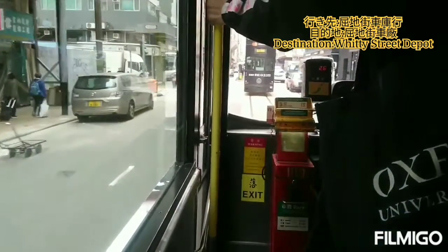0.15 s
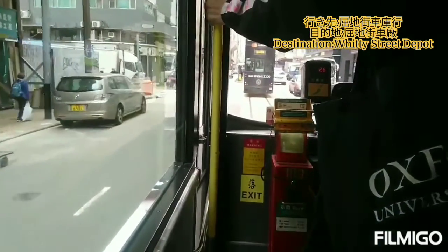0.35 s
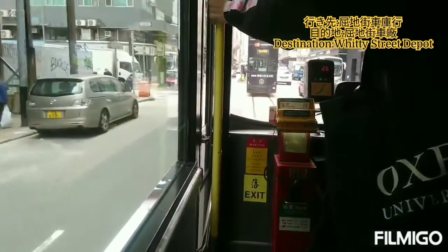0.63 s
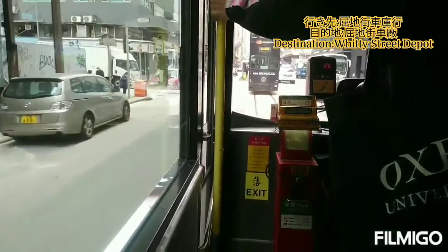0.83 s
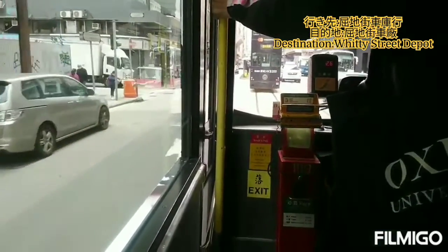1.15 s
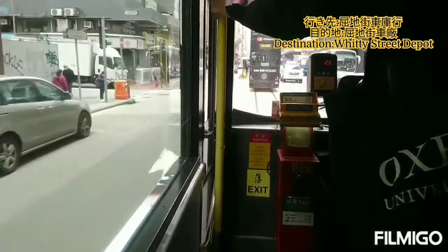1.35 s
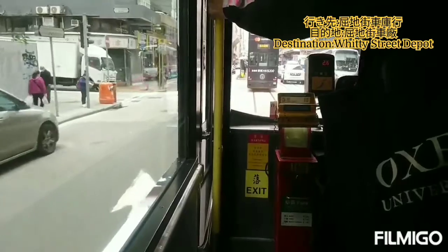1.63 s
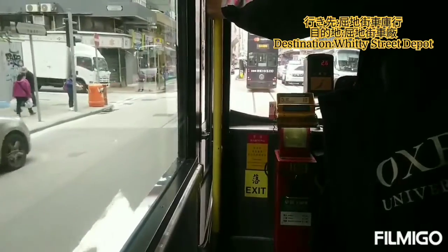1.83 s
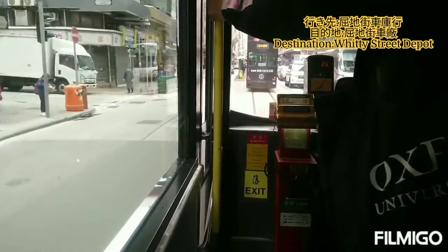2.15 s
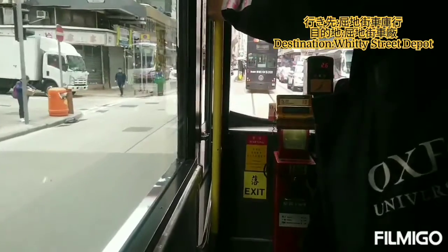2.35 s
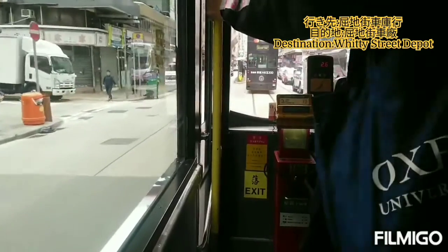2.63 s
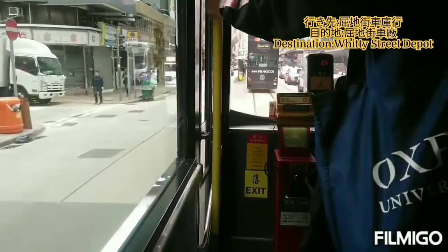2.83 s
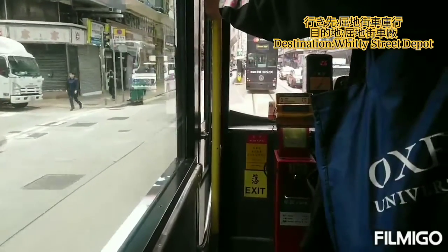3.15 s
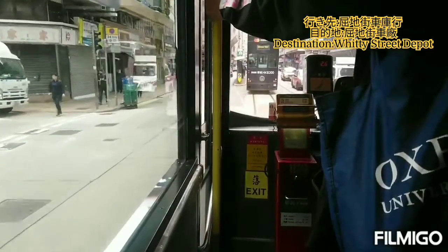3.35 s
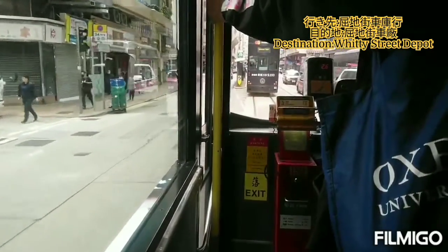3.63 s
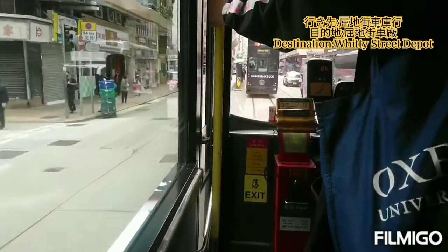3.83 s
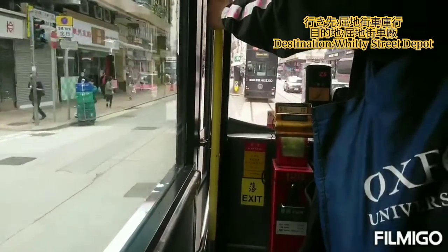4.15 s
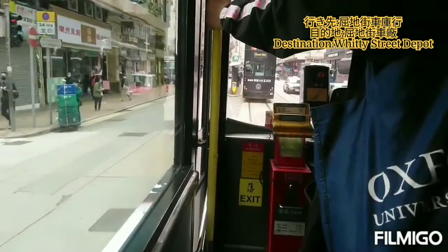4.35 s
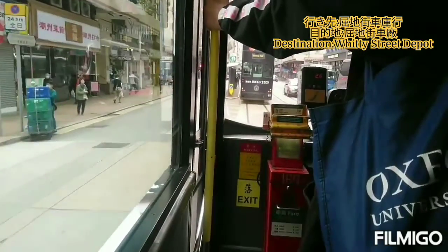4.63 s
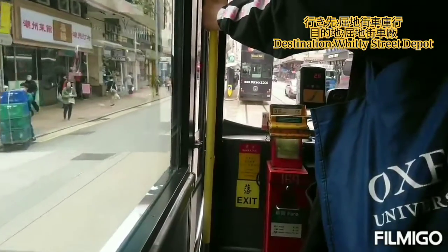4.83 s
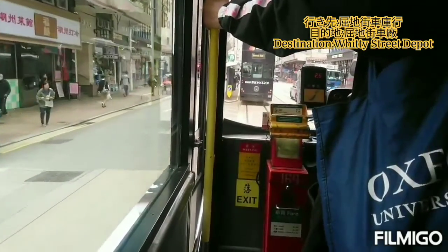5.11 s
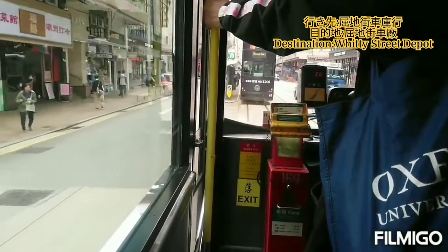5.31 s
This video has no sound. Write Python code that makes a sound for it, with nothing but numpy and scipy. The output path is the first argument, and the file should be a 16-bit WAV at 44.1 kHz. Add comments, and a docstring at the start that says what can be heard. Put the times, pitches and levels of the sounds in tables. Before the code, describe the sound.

Inside a slow tram, loud thuds and clattering fittings open abruptly, then a quiet low rumble continues with occasional knocks and faint late wheel singing.

```python
"""Low thuds, knocks and loud clatter come first, then the steady rumble of a slow tram from inside.
Rough rail shakes the wheels, and the floor and side panels rumble at their own pitches (filtered noise).
At joints and points the floor thuds and the frame knocks (fading sine waves), and loose fittings clatter
(bursts of coloured noise). Small parts tick, and a wheel sings faintly near the end (narrow noise).
Faint steady high hiss lies underneath."""
import sys
import numpy as np
from scipy import signal
from scipy.io import wavfile

SR = 44100
rng = np.random.default_rng(int(sys.argv[2]) if len(sys.argv) > 2 else 0)


def unload_wav(signal):
    """Save mono or channel-first audio to the path in sys.argv[1] as 16-bit WAV at rate SR, clipped to [-1, 1]."""
    wavfile.write(
        sys.argv[1],
        SR,
        np.round(np.clip(np.atleast_2d(signal).T, -1, 1) * 32767).astype(np.int16),
    )


N = 241336   # length in samples

# Steady rolling of the car body: start_s, floor_boom_db, panel_rumble_db
BODY_ROLLING = [(0, -29, -21), (.4, -46.5, -40.5), (.6, -46, -42), (.9, -48.5, -41.5), (1.2, -45, -43),
                (1.55, -50.5, -39.5), (1.75, -48.5, -45), (2.2, -46.5, -43), (2.6, -45, -41.5),
                (2.8, -45.5, -38.5), (2.98, -46.5, -44.5), (3.23, -49, -42), (3.7, -48.5, -45),
                (3.9, -47, -38.5), (4.2, -52, -44), (4.5, -44.5, -37), (4.87, -47, -37.5), (5.2, -44, -43),
                (5.47, -51.5, -43)]
# Wheels on the rail head: start_s, low_roar_db, high_roar_db, grinding_db, grinding_centre_hz
WHEELS_ON_RAIL = [(0.0, -47, -49, -61, 2470), (0.03, -39, -58, -47.5, 2620), (0.18, -42.5, -62, -55, 2630),
                  (0.33, -60.5, -75, -60, 2330), (0.47, -52, -62.5, -66, 2490), (0.68, -54, -64, -74, 2370),
                  (0.84, -48.5, -60, -71, 2680), (1.05, -54.5, -64.5, -74, 2437),
                  (1.25, -54.5, -70.5, -75, 2580), (1.42, -54, -61, -73, 2330),
                  (1.69, -54.5, -67.5, -74, 2700), (1.74, -55, -66, -70.5, 3110),
                  (1.9, -48.5, -62, -72, 2684), (2.03, -54, -70.5, -76, 3184),
                  (2.16, -54.5, -67.5, -66, 2525), (2.33, -55.5, -61, -71.5, 3140),
                  (2.36, -46, -54, -75, 2466), (2.48, -57.5, -67, -64, 2960),
                  (2.65, -52.5, -62, -71.5, 3110), (3.03, -54, -64.5, -69, 2530),
                  (3.23, -53, -66, -68.5, 3170), (3.35, -55.5, -65.5, -71.5, 2460),
                  (3.7, -52.5, -67.5, -71.5, 2650), (3.93, -54.5, -62.5, -70, 2310),
                  (4.26, -50.5, -63, -73, 2500), (4.51, -54.5, -62, -71, 2304),
                  (4.65, -52, -59.5, -70, 2444), (4.87, -53, -62.5, -69, 2606),
                  (5.1, -52.5, -64, -68.5, 2560), (5.47, -52, -64, -71, 2560)]
# Resonances of the floor, then of the side panels: pitch_hz, half_width_hz, level_db (relative)
# Each of the two filter passes is twice half_width_hz wide.
FLOOR_RESONANCES = [(51.4, 23, 4), (62, 4.6, -15.5), (88.4, 32, 0.5), (107, 60, -9.5)]
PANEL_RESONANCES = [(162, 16.8, 1.5), (192.9, 19.6, 3.5), (250.1, 5.9, -1), (287.3, 39, 2.5),
                    (357, 46, -9.5), (403, 18, -18), (500, 17, -17.5)]
# Tone colour of the low roar, the high roar and the grinding: pitch_hz, level_db (relative, per Hz)
LOW_ROAR_COLOUR = [(300, -2.5), (400, -1), (500, -2.5), (630, -7.5), (800, -9), (1000, -16.5), (1250, -31)]
HIGH_ROAR_COLOUR = [(800, -9), (1000, 0), (1250, 0.5), (1500, -4.5), (1750, -8.5), (2000, -15),
                    (2600, -28.5)]
GRINDING_COLOUR = [(1200, -31), (1700, -3), (2100, 0), (2500, -3), (3200, -3), (3800, -4.5), (4300, -10.5),
                   (4800, -23), (5500, -31), (7000, -53.5)]
GRINDING_PEAK_DB, GRINDING_PEAK_OCTAVES = 8, 0.34   # extra level around the wandering centre, and its spread

# Floor thuds: start_s, peak_db (before the treble cut), pitch_hz, length_s
FLOOR_THUDS = [(0, -9, 78, 0.031), (0.067, -16.5, 52, 0.083), (0.124, -6, 62, 0.016),
               (0.152, -7, 53.4, 0.04), (0.224, -9.5, 56.8, 0.066), (0.248, -11, 52.5, 0.076),
               (0.306, -25.5, 55, 0.048), (0.553, -33.5, 62, 0.049), (0.728, -18, 62, 0.033),
               (0.781, -34, 51, 0.067), (0.847, -36.5, 60, 0.06), (0.861, -39, 62, 0.086),
               (1.832, -34, 73.6, 0.023), (1.892, -20.5, 50.2, 0.038), (1.902, -16, 58.9, 0.05),
               (1.952, -42, 58.8, 0.028), (2.044, -31.5, 76, 0.026), (2.36, -26, 67.2, 0.085),
               (2.397, -18, 50, 0.076), (2.73, -39.5, 58.6, 0.058), (3.978, -30, 88, 0.018),
               (4.025, -26.5, 56, 0.042), (4.085, -30, 55.4, 0.02), (4.185, -27.5, 51.7, 0.081),
               (4.328, -38.5, 73, 0.059), (4.527, -24, 62.5, 0.02), (4.572, -22, 51.4, 0.025)]
THUD_CUT_HZ = 400   # treble cut on the thuds, so their starts and ends stay soft
# Frame knocks: start_s, peak_db, pitch_hz, fade_s (time to fall 60 dB)
FRAME_KNOCKS = [(0.023, -17, 191, 0.046), (0.067, -16.5, 267, 0.06), (.086, -16, 230, 0.029),
                (0.1, -15.5, 281, 0.07), (0.141, -17.5, 191, 0.035), (0.222, -17, 186, 0.28),
                (0.239, -16, 232, 0.078), (0.688, -31, 285, 0.14), (0.719, -20, 258, 0.037),
                (1.305, -31, 193, 0.074), (1.511, -33.5, 184, 0.23), (1.822, -30, 280, 0.068),
                (1.834, -24, 290, 0.034), (1.849, -24, 300, .06), (1.861, -14.5, 301, 0.051),
                (1.889, -33, 394, 0.084), (1.92, -27, 176, 0.16), (2.28, -32.5, 283.3, 0.22),
                (2.309, -24.5, 279, 0.14), (2.391, -30.5, 162.3, 0.32), (2.438, -33, 230, 0.042),
                (2.544, -33.5, 167, 0.083), (2.597, -37, 311, 0.066), (2.744, -32.5, 297.7, 0.22),
                (2.814, -37, 190, 0.075), (3.23, -34.5, 308.5, 0.094), (3.761, -37.5, 179, 0.19),
                (3.984, -27, 153, 0.095), (4.007, -21.5, 192, 0.08), (4.017, -28.5, 280, 0.023),
                (4.05, -44, 322, 0.038), (4.06, -27.5, 204, 0.049), (4.078, -30, 263, .05),
                (4.37, -30.5, 303, 0.091), (4.476, -21.5, 202, 0.064), (4.51, -27.5, 243, 0.062),
                (4.616, -34, 178, 0.11), (4.691, -27, 188, 0.1), (4.766, -33.5, 305, 0.23),
                (5.03, -34.5, 202.5, 0.23), (5.308, -31, 202, 0.14)]
# Boom around each thud and rumble around each knock: dB relative to the blow, seconds to rise or fall 20 dB
BOOM_UNDER_DB, BOOM_RISE_S, BOOM_FALL_S = -12.5, 0.11, 0.11
PANEL_UNDER_DB, PANEL_RISE_S, PANEL_FALL_S = -13.5, 0.041, 0.11

# Rattles of loose parts: peak_s, seats_and_doors_db, hand_rails_db, panes_and_treble_db, rise_s, fall_s (20 dB)
LOOSE_RATTLES = [(0.024, -41, -40.5, -51, 0.023, 0.07), (0.065, -27.5, -43, -47.5, 0.059, 0.18),
                 (.043, -38, -46, -52, .03, 0.054), (.103, -26.5, -36, -44, 0.07, 0.12),
                 (0.14, -31, -32, -45, 0.039, 0.056), (0.187, -28, -44, -45.5, 0.047, 0.02),
                 (0.258, -38.5, -52, -49, 0.099, 0.16), (0.304, -39, -39.5, -52.5, 0.18, 0.061),
                 (.37, -51, -51, -74, .06, 0.12), (.755, -53, -70, -77, 0.059, 0.14),
                 (.845, -62, -67.5, -65, 0.2, 0.18), (1.87, -51, -48.5, -59, 0.027, 0.092),
                 (1.897, -44, -60, -68, 0.042, 0.06), (1.925, -57, -65, -63.5, .03, 0.065),
                 (1.99, -64, -78, -61.5, 0.11, 0.13), (2.049, -68, -71, -67, 0.096, 0.044),
                 (2.33, -49, -58, -73, 0.05, 0.066), (2.344, -42, -55, -67, 0.043, 0.037),
                 (2.375, -56, -51, -65, 0.053, .06), (2.4, -57, -47.5, -57.5, 0.057, 0.15),
                 (2.445, -50, -50, -57, 0.063, 0.12), (2.505, -61, -58.5, -59, 0.04, 0.15),
                 (2.57, -54, -81, -66.5, .06, 0.17), (2.86, -63, -59, -68, 0.049, 0.093),
                 (3.48, -66, -80, -63.5, 0.047, 0.063), (4.028, -41.5, -48.5, -64.5, 0.03, 0.077),
                 (4.051, -47.5, -55, -67.5, 0.052, 0.17), (4.11, -65, -56, -77, 0.051, .05),
                 (4.23, -55.5, -58, -83, 0.063, .08), (4.319, -61, -64, -79, 0.09, 0.037),
                 (4.58, -60, -57.5, -72, 0.29, 0.13), (4.75, -51, -71, -74.5, 0.056, 0.2),
                 (5.392, -47.5, -63, -68.5, 0.038, 0.051)]
# Tone colour of seats and doors, then of hand rails: pitch_hz, level_db (relative, per Hz)
FITTINGS_COLOUR = [(300, -14), (420, 6.5), (520, 7.5), (700, -4), (900, -12), (1200, -27.5)]
RAILS_COLOUR = [(700, -7), (900, 2.5), (1200, -8), (1500, -3.5), (1900, -9.5), (2300, -20.5), (2800, -33.5)]
# Tone colour of the window panes up to 8000 Hz; above that, faint airy treble that swells with the rattles:
# pitch_hz, level_db (relative, per Hz)
PANES_AND_TREBLE_COLOUR = [(1500, -21), (1900, -5.5), (2300, -2.5), (2700, -4.5), (3200, -2.5), (3700, -7),
                           (4200, -16), (4800, -19.5), (5500, -23.5), (6400, -27), (7000, -39.5),
                           (8500, -34), (10500, -31), (13000, -41), (16000, -44.5)]
# Two rings of the panes, then a broad band of the same airy treble in the last row:
# pitch_hz, half_width_hz (as for the floor), level_db (relative)
RINGS_AND_TREBLE = [(3420, 120, -10.5), (6150, 160, -19), (8560, 990, -21.5)]

# Sharp taps and ticks: start_s, peak_db, pitch_hz, width_hz, fade_s (time for the noise to fall 60 dB)
SHARP_TICKS = [(0.022, -39, 1190, 1190, 0.033), (.063, -22, 606, 260, 0.034), (0.074, -41, 1480, 400, .04),
               (0.1, -27, 1200, 990, 0.043), (.186, -29.5, 600, 400, .04), (.03, -36, 2000, 1500, 0.035),
               (.22, -44, 2500, 2500, .04), (.29, -40, 2280, 2500, 0.055), (0.137, -35, 1520, 500, 0.036),
               (0.139, -14, 464, 200, 0.045), (.172, -24, 520, 247, .04), (0.255, -29, 900, 300, 0.044),
               (.066, -42, 2500, 1500, .04), (.1, -36, 3000, 1990, .04), (.143, -42, 3300, 2400, .04),
               (.28, -56.5, 5150, 400, .25), (.354, -42, 1100, 690, 0.045),
               (1.7615, -42, 3240, 1100, 0.012), (1.7615, -47.5, 2120, 1105, 0.013),
               (1.861, -32.5, 805, 295, 0.095), (1.865, -55, 3270, 400, 0.054),
               (1.866, -59, 5300, 500, 0.74), (1.89, -35.5, 826, 400, 0.041), (1.995, -45.5, 780, 99, .08),
               (2.126, -60, 900, 600, 0.033), (2.228, -45.5, 780, 91, 0.52), (2.349, -38, 720, 202, 0.066),
               (2.398, -34.5, 890, 500, 0.052), (2.327, -47, 1300, 600, .05), (2.346, -45, 1400, 600, .05),
               (2.398, -43, 1480, 500, 0.047), (2.398, -59, 3200, 1800, 0.034),
               (2.443, -59, 3200, 1400, .06), (2.499, -52, 3020, 700, 0.055), (2.565, -55, 3100, 600, .08),
               (2.495, -42.5, 920, 296, 0.089), (3.469, -64, 2400, 500, .1), (3.55, -58.5, 2430, 300, 0.14),
               (3.735, -60, 3700, 3020, 0.04), (3.845, -52, 1500, 800, 0.062), (4.02, -49, 1700, 1000, .06),
               (4.047, -42.5, 1410, 890, .05), (4.11, -50, 1200, 1200, 0.045),
               (4.0189, -32, 785, 387, 0.044), (4.036, -62, 5380, 900, 0.31),
               (4.052, -31.5, 560, 302, 0.07), (4.065, -35, 524, 256, 0.1), (4.325, -49, 1405, 400, 0.067),
               (4.635, -51.5, 1800, 600, 0.043), (4.643, -43, 765, 140, 0.04), (4.735, -37, 476, 91, 0.1),
               (4.811, -42, 724, 100, 0.037)]
CONTACT_OVER_NOISE = 1.2   # strength of the first contact in a tick

# Bursts of wheel song: peak_s, low_ring_db, high_ring_db, low_ring_hz
WHEEL_SONG = [(4.33, -58.5, -87, 760), (4.55, -51, -82, 754), (4.6, -54, -84, 765),
              (4.689, -50.5, -74, 760), (4.821, -47, -80, 745), (4.95, -45, -70, 728), (5.0, -58, -84, 731),
              (5.051, -43.5, -82, 722), (5.121, -49.5, -78, 715), (5.21, -55, -68, 730),
              (5.28, -60, -71.5, 740), (5.41, -54, -71, 720)]
SING_RISE_S, SING_FALL_S = 0.075, 0.089   # times for 20 dB
SING_LOW_WIDTH_HZ, SING_HIGH_HZ, SING_HIGH_WIDTH_HZ = 90, 2620, 170   # widths set how fast each ring wavers

# Tone colour of the faint hiss: pitch_hz, level_db (relative, per Hz)
HISS_COLOUR = [(3500, -6), (5000, -3.5), (7000, -10), (10000, -10.5), (13000, -6), (16000, -8.5)]
HISS_DB = -88
PEAK_TOP = .85   # level towards which the highest peaks are gently rounded
CUTOFF_HZ = 15500   # start of the stopped treble


def rolling():
    """Rough rail keeps floor, panels and wheels sounding; thuds and knocks briefly drive the body harder."""
    boom_db, panel_db = in_time(BODY_ROLLING)
    roar_db, high_db, grind_db, grind_hz = in_time(WHEELS_ON_RAIL)
    thud_s, thud_db, _, length = np.transpose(FLOOR_THUDS)
    knock_s, knock_db, *_ = np.transpose(FRAME_KNOCKS)
    thud_boom = swells(thud_s + length / 2, thud_db + BOOM_UNDER_DB, BOOM_RISE_S, BOOM_FALL_S)
    knock_rumble = swells(knock_s, knock_db + PANEL_UNDER_DB, PANEL_RISE_S, PANEL_FALL_S)
    # hypot adds the powers of steady rolling and blows
    floor = np.hypot(from_db(boom_db), thud_boom) * rumble(FLOOR_RESONANCES, lumpy_db=1.0)
    panels = np.hypot(from_db(panel_db), knock_rumble) * rumble(PANEL_RESONANCES, lumpy_db=1.5)
    low_roar = from_db(roar_db) * coloured(LOW_ROAR_COLOUR, patchy_db=2.5)
    high_roar = from_db(high_db) * coloured(HIGH_ROAR_COLOUR, patchy_db=2.0)
    grains = from_db(0.9 * drift(60))
    grinding = coloured(GRINDING_COLOUR, patchy_db=2.0, grains=grains, peak_hz=grind_hz)
    return floor + panels + low_roar + high_roar + from_db(grind_db) * grinding


def thuds():
    """A wheel crossing a gap pushes the sprung floor down and lets it go: a low tone swells and fades."""
    out = np.zeros(N)
    start_turns = rng.random((len(FLOOR_THUDS), 1))   # random starting point in the wave
    for (s, peak_db, hz, length), turn in zip(FLOOR_THUDS, start_turns):
        t = np.arange(round(length * SR)) / SR
        swell = np.sin(np.pi * t / t[-1]).clip(0) ** 0.53
        wave = np.sin(2 * np.pi * (hz * t + turn))
        out[round(s * SR):][:len(t)] += from_db(peak_db) * swell * wave
    return signal.sosfilt(signal.butter(2, THUD_CUT_HZ, fs=SR, output="sos"), out)


def knocks():
    """Each frame knock is a soft contact: its ring swells over the contact time, then dies."""
    out = np.zeros(N + SR // 2)
    t = np.arange(SR // 2) / SR
    start_turns = rng.random((len(FRAME_KNOCKS), 1))
    for (s, peak_db, hz, t60), turn in zip(FRAME_KNOCKS, start_turns):
        swell = (1 - np.exp(-t / 0.0022)) ** 2 * from_db(-60 * t / t60)
        wave = np.sin(2 * np.pi * (hz * t + turn))
        out[round(s * SR):][:len(t)] += from_db(peak_db) * swell / swell.max() * wave
    return out[:N]


def clatter():
    """Dense uneven contacts of loose parts while a joint shakes the car; panes ring, airy treble swells along."""
    s, fittings_db, rails_db, bright_db, rise, fall = np.transpose(LOOSE_RATTLES)
    contacts = from_db(2.3 * drift(90))
    fittings = coloured(FITTINGS_COLOUR, patchy_db=0.0, grains=contacts)
    rails = coloured(RAILS_COLOUR, patchy_db=4.0, grains=contacts)
    panes_and_treble = coloured(PANES_AND_TREBLE_COLOUR, patchy_db=3.5, grains=contacts)
    bright = panes_and_treble + from_db(-10.0) * rumble(RINGS_AND_TREBLE, lumpy_db=2.0)
    return (swells(s, fittings_db, rise, fall) * fittings
            + swells(s, rails_db, rise, fall) * rails
            + swells(s, bright_db, rise, fall) * bright)


def ticks():
    """A first contact and a short burst of dying noise pass through a steep band around the tick's pitch."""
    out = np.zeros(N + 4000)
    t = np.arange(4000) / SR
    noises = rng.standard_normal((len(SHARP_TICKS), len(t)))
    for (s, peak_db, hz, width, t60), noise in zip(SHARP_TICKS, noises):
        contact = CONTACT_OVER_NOISE * np.sqrt(SR / width) * (t == 0)   # a single-sample click
        burst = noise * np.minimum(t / .001, 1) * from_db(-60 * t / t60)
        low = np.sqrt(hz ** 2 + width ** 2 / 4) - width / 2   # puts the pitch mid-band on a musical scale
        band = signal.butter(3, [low, low + width], "band", fs=SR, output="sos")
        tick = signal.sosfilt(band, contact + burst)
        out[round(s * SR):][:len(t)] += from_db(peak_db) * tick / np.abs(tick).max()
    return out[:N]


def singing_wheel():
    """Rolling noise excites two narrow modes of the wheel rim in short bursts; the low one wavers in pitch."""
    s, low_db, high_db, low_hz = np.transpose(WHEEL_SONG)
    low_curve = np.interp(np.arange(N) / SR, s, low_hz)
    rings = ((low_db, low_curve, SING_LOW_WIDTH_HZ),
             (high_db, np.full(N, SING_HIGH_HZ), SING_HIGH_WIDTH_HZ))
    out = 0
    for ring_db, hz, width in rings:
        turn = 2 * np.pi * np.cumsum(hz) / SR
        # slow random strengths of cosine and sine make a narrow noise around the pitch
        ring = drift(width / 2) * np.cos(turn) + drift(width / 2) * np.sin(turn)
        out = out + swells(s, ring_db, SING_RISE_S, SING_FALL_S) * rms_one(ring)
    return out


def faint_hiss():
    """Faint steady high hiss: noise shaped towards the treble."""
    return from_db(HISS_DB) * coloured(HISS_COLOUR, patchy_db=1.5)


def rumble(modes, lumpy_db):
    """Uneven shaking rings each mode; two filter passes keep the valleys between modes dark; rms 1."""
    out = 0
    lead = SR // 10   # time for the filters to settle, cut off afterwards
    for hz, width, level_db in modes:
        lumps = np.pad(drift(15.0), (lead, 0))
        rough = rng.standard_normal(N + lead) * from_db(lumpy_db * lumps)
        once = resonance(rough, hz, width * 2)
        twice = resonance(once, hz, width * 2)
        out = out + from_db(level_db) * rms_one(twice[lead:])
    return rms_one(out)


def coloured(spectrum, patchy_db, grains=None, peak_hz=None):
    """Noise (uneven if grains are given) in fifth-octave bands, each with its level and flicker; rms 1."""
    hz, level_db = np.transpose(spectrum)
    out = 0
    together = drift(9)   # flicker shared by all bands
    edges = 300 * 2 ** np.arange(0, 5.9, 1 / 5)
    white = rng.standard_normal((2, N)) * (1 if grains is None else grains)
    for k, (low, high) in enumerate(zip(edges, edges[1:])):
        if high < hz[0] or low > hz[-1]:
            continue
        sos = signal.butter(3, [low, high], "band", fs=SR, output="sos")
        band = signal.sosfilt(sos, white[k % 2])   # neighbouring bands use different noise
        centre_db = np.interp(np.log(low * high) / 2, np.log(hz), level_db, -120, -120)
        if peak_hz is not None:
            octaves_off = np.log2(np.sqrt(low * high) / peak_hz)
            centre_db = centre_db + GRINDING_PEAK_DB * np.exp(-(octaves_off / GRINDING_PEAK_OCTAVES) ** 2)
        flicker_db = patchy_db * (.5 * together + drift(18))
        out = out + from_db(centre_db + flicker_db) * band
    return rms_one(out)


def swells(s, peak_db, rise_s, fall_s):
    """Gain curve of events that climb 20 dB per rise_s to a peak and lose 20 dB per fall_s; powers add."""
    late = np.arange(0, N + 32, 32) / SR - np.reshape(s, (-1, 1))   # computed at every 32nd sample
    rise, fall = np.reshape(rise_s, (-1, 1)), np.reshape(fall_s, (-1, 1))
    level_db = np.reshape(peak_db, (-1, 1)) - 20 * np.maximum(-late / rise, late / fall)
    gain = np.sqrt(np.sum(from_db(level_db) ** 2, axis=0))
    return np.interp(np.arange(N) / 32, np.arange(len(gain)), gain)


def resonance(x, hz, width):
    """Two-pole resonance, a filter that rings at one pitch, with gain 1 on top."""
    r = np.exp(-np.pi * width / SR)
    top = [(1 - r * r) / 2, 0, (r * r - 1) / 2]
    return signal.lfilter(top, [1, -2 * r * np.cos(2 * np.pi * hz / SR), r * r], x)


def drift(rate):
    """Slow chance: noise at every 40th sample through a double one-pole low-pass at rate Hz; rms 1."""
    r = np.exp(-80 * np.pi * rate / SR)
    noise = rng.standard_normal(N // 40 + 2002)
    slow = signal.lfilter([1], [1, -2 * r, r * r], noise)[2000:]   # the filter settles first
    return np.interp(np.arange(N) / 40, np.arange(len(slow)), rms_one(slow))


def in_time(rows):
    """Table columns as curves over all samples."""
    s, *columns = np.transpose(rows)
    return [np.interp(np.arange(N) / SR, s, c) for c in columns]


def from_db(db):
    """Decibels to gain."""
    return 10 ** (np.asarray(db) / 20)


def rms_one(x):
    """Scale to rms 1 (an average strength of 1)."""
    return x / np.sqrt(np.mean(x ** 2) + 1e-20)


def scene():
    """All sources, heard at one seat."""
    joints = thuds() + knocks() + clatter()
    return (rolling() + joints + ticks() + singing_wheel() + faint_hiss())[None]


def record(dry):
    """The small microphone drops the deepest bass; the highest peaks are rounded and the top is cut."""
    thin = signal.sosfilt(signal.butter(4, 44, "high", fs=SR, output="sos"), dry)
    rounded = PEAK_TOP * np.tanh(thin / PEAK_TOP)
    return signal.sosfilt(signal.cheby2(12, 70, CUTOFF_HZ, fs=SR, output="sos"), rounded)


dry = scene()
out = record(dry)
unload_wav(out)
```